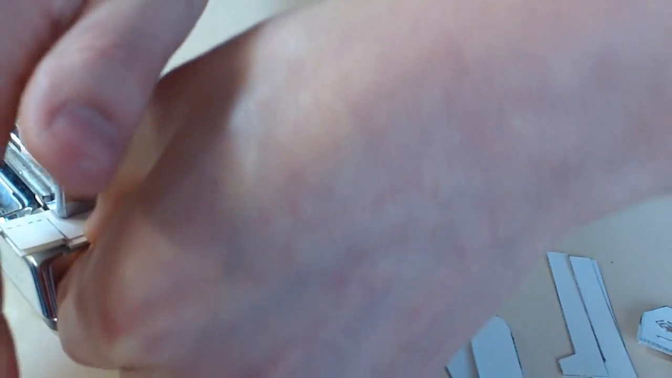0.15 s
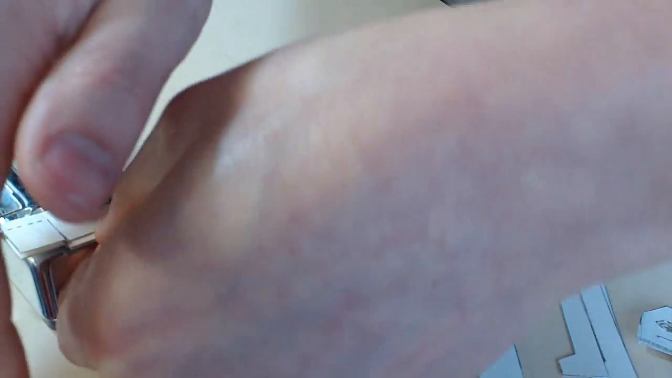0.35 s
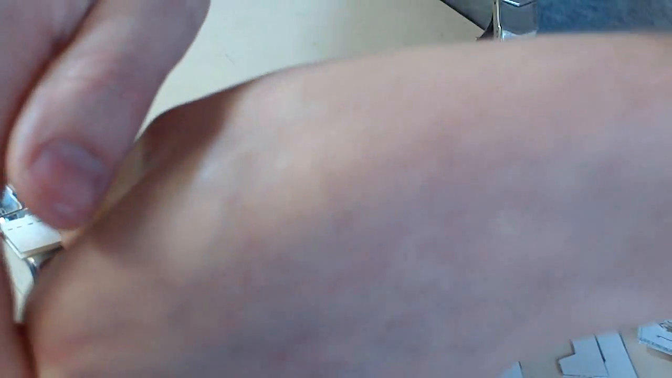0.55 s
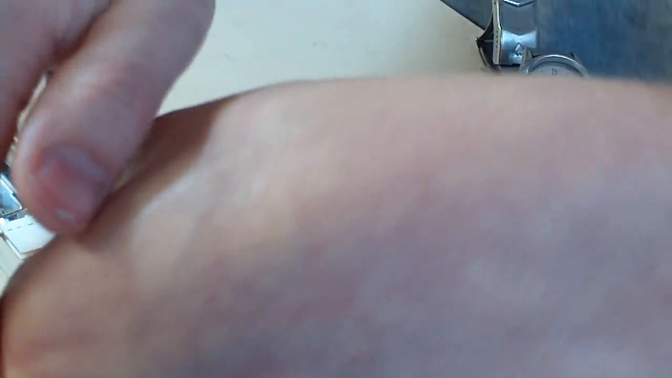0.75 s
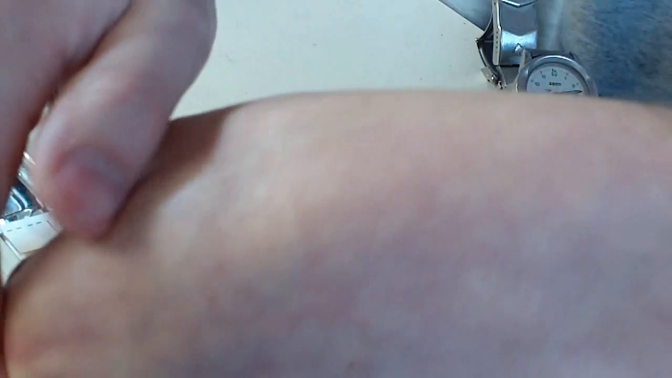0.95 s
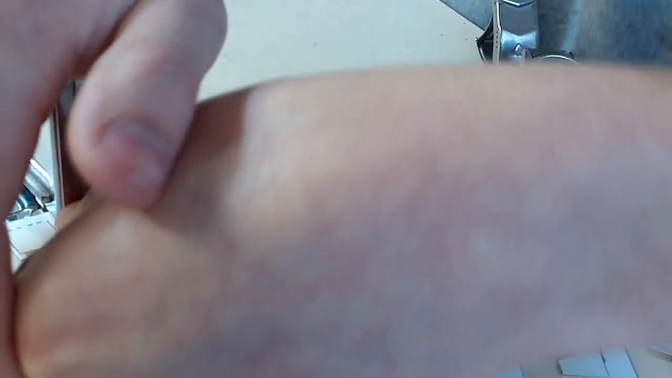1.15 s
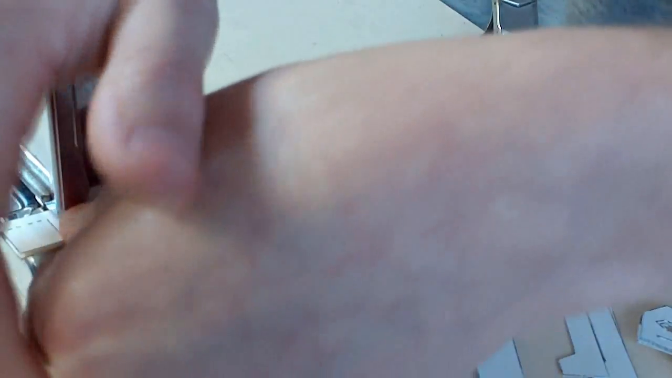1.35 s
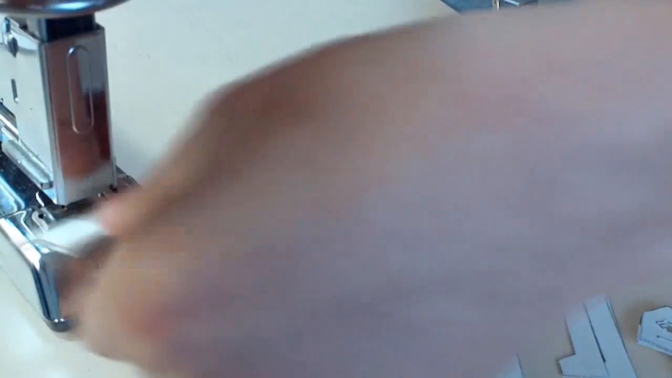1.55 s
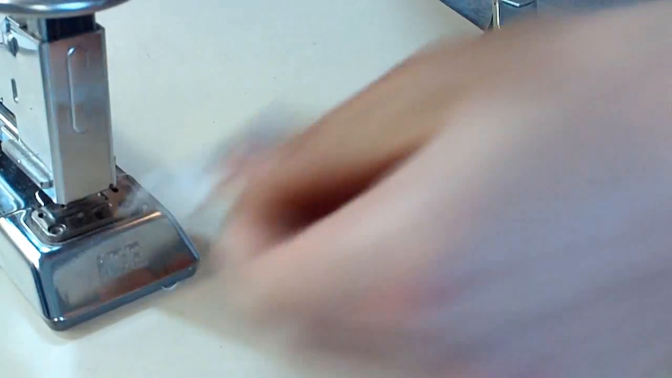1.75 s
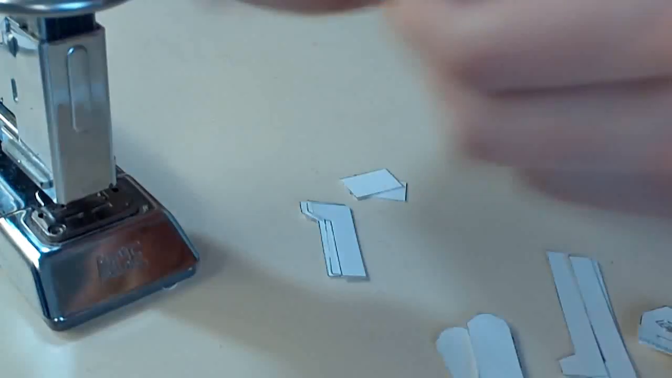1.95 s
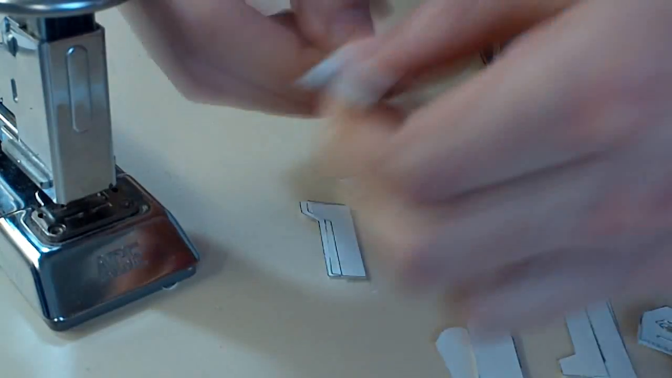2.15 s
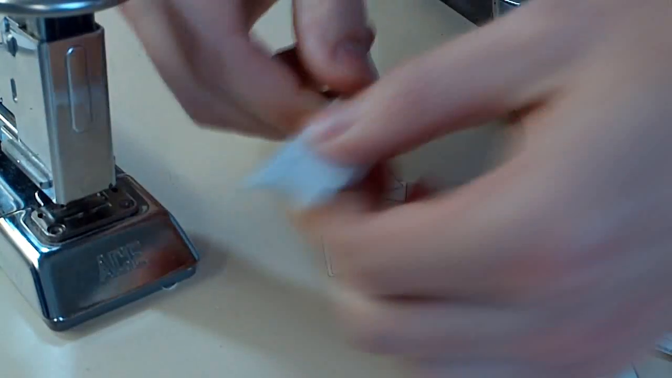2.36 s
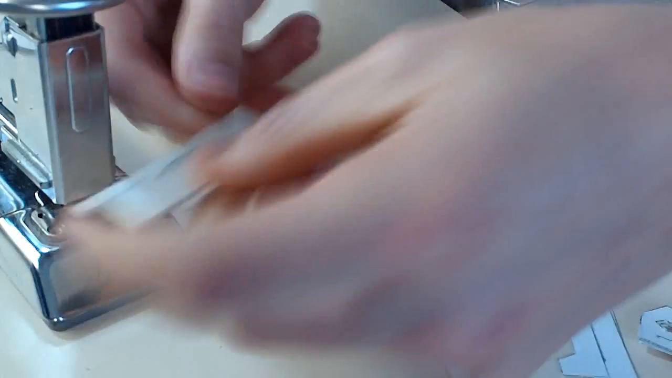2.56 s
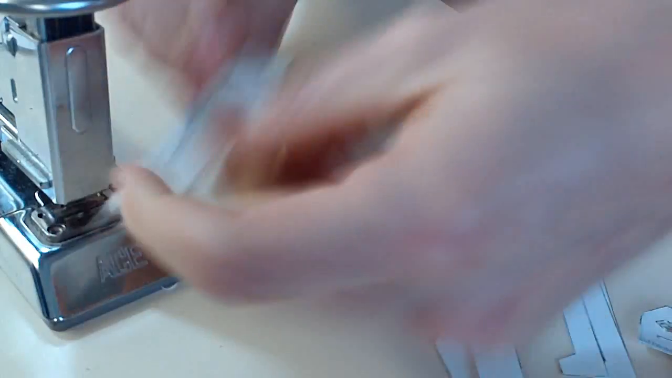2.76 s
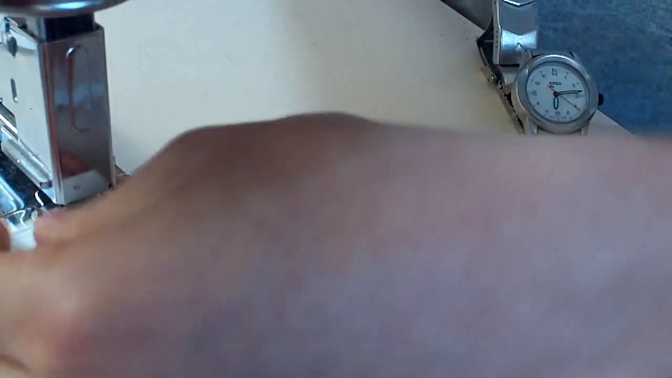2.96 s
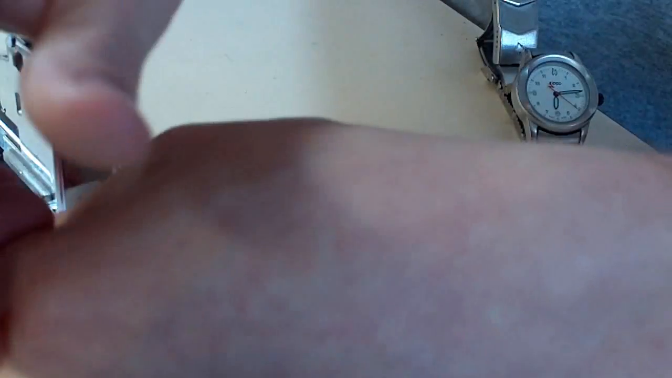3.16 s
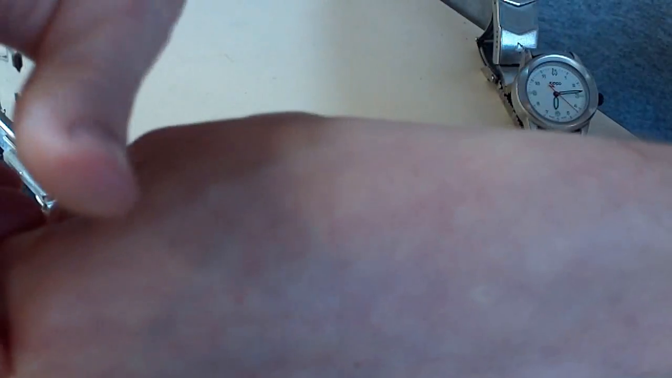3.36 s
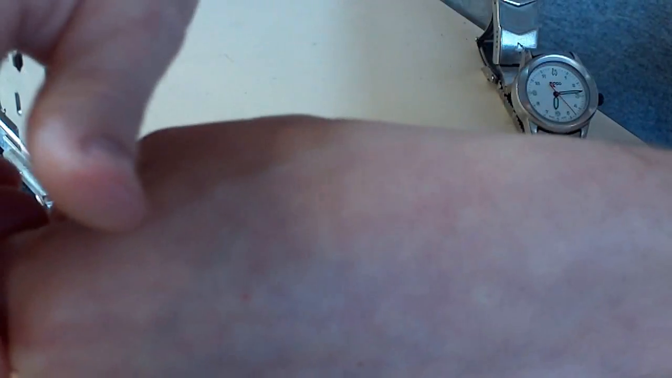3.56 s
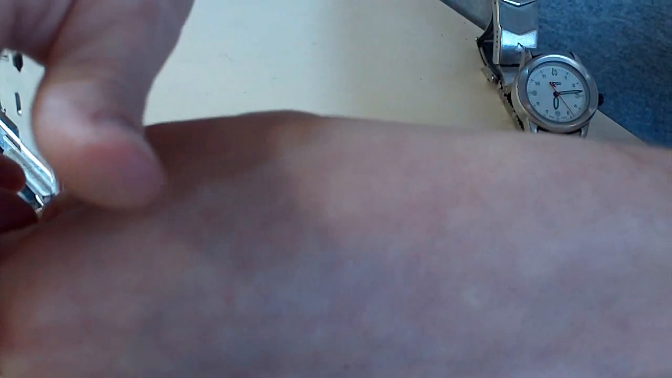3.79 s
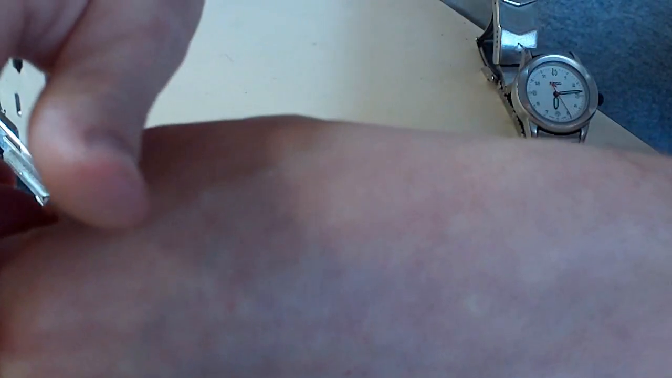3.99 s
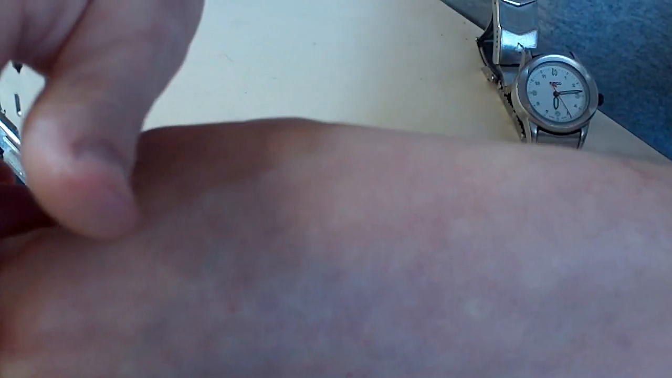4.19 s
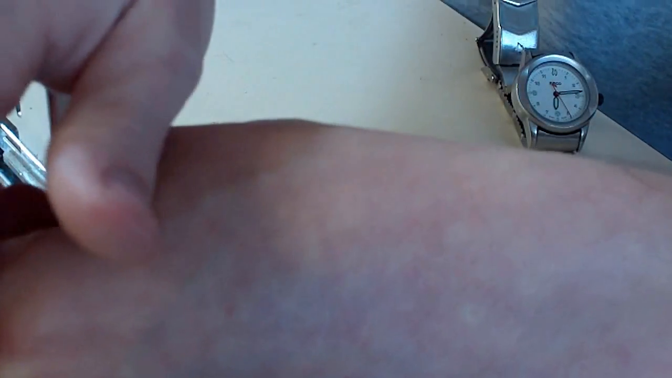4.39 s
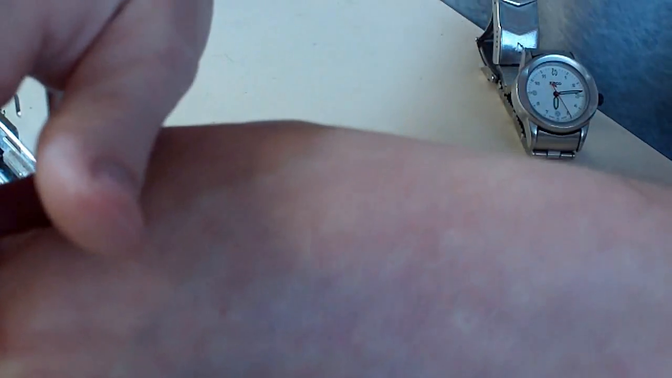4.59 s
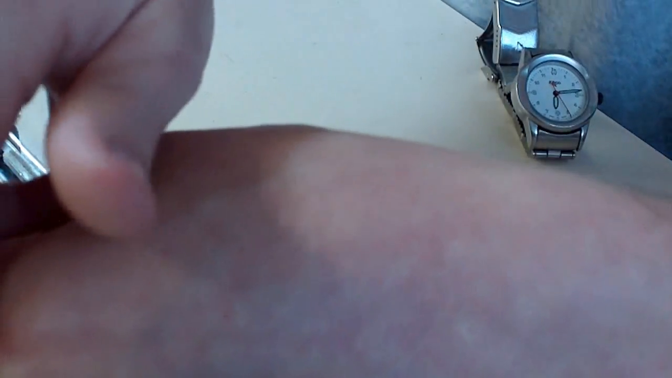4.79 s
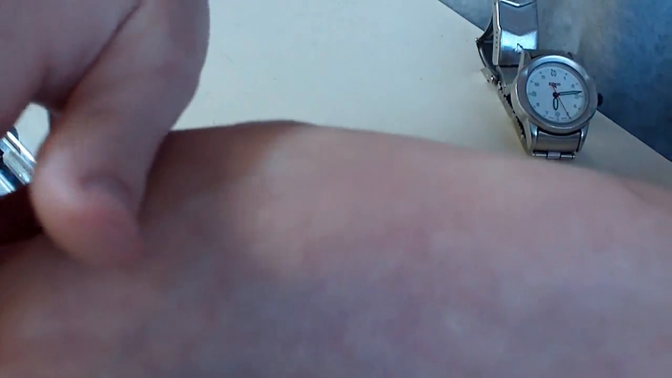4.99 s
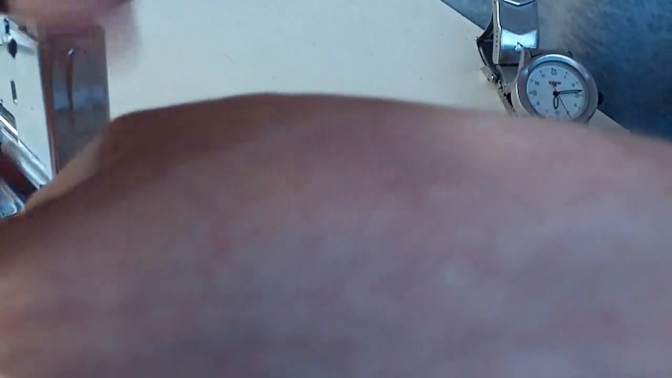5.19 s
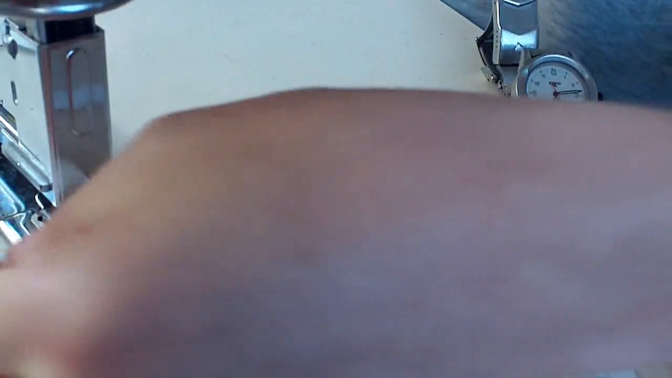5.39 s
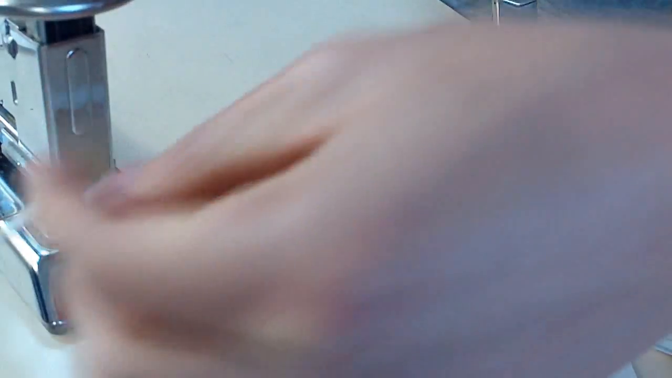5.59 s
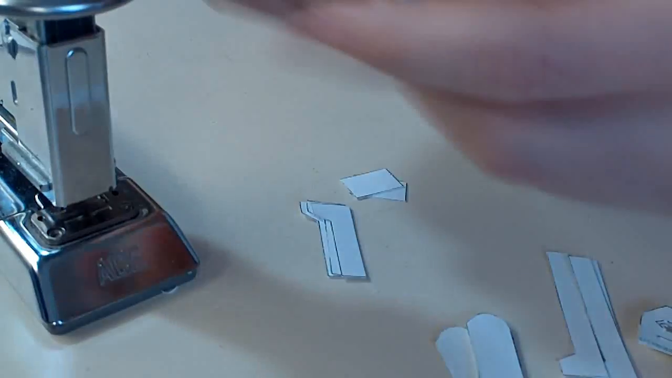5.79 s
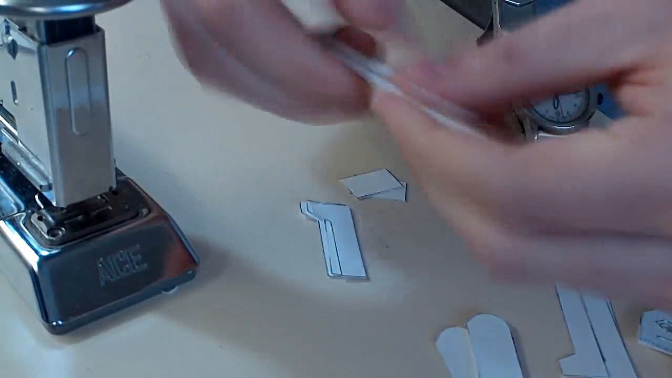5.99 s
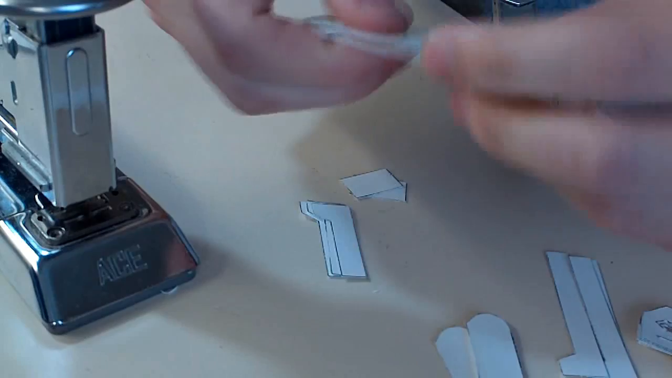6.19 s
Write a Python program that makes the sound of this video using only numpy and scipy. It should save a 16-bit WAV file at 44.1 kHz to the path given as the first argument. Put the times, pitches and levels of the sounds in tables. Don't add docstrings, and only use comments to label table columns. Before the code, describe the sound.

Steady hiss and low rumble of a small quiet room, with faint fingers rustling on card. At 0.2 s a stapler blade snaps through with a sharp steel click and a short crunch, stirring the desk. At 0.8 s the head bottoms out: a very loud, flattened thud with low wooden boom, crushed card and quick bounces. Around 1.3 to 1.5 s the spring slides and the arm clacks back with small ticks. Soft rubbing and card rustle continue from 1.6 s, fading to near-quiet hiss by 3 s. A brief rustle at 4.15 s leads to the second snap at 4.27 s, a second heavy thud at 4.7 s, and a clack at 5.07 s with a longer loose metal rattle to 5.2 s. Light card handling and tiny ticks, strongest near 5.9 s, end it. Close, noisy, dull-topped microphone, slightly louder right, overloading on blows, with tiny dropouts.

```python
import sys
import numpy as np
from scipy import signal
from scipy.io import wavfile
from scipy.ndimage import uniform_filter1d

SR = 44100
rng = np.random.default_rng(int(sys.argv[2]) if len(sys.argv) > 2 else 0)


def attenuation_scalar(level_db):
    decades = np.asarray(level_db, float) / 20
    return 10 ** decades


def digitize_waveform(pressure):
    field = np.atleast_2d(pressure).T
    bounded = np.clip(field, -1, 1)
    quanta = np.round(bounded * 32767).astype(np.int16)
    wavfile.write(sys.argv[1], SR, quanta)


N = 275149

# start_s, steel_db, desk_db, pace (1 = usual spacing of contacts)
SLAMS = [
    (0.8248, 2.5, -1.5, .8),
    (4.699, -1.2, 0.6, 1.05),
]
# start_s, steel_db, desk_db, pace (1 = usual spacing of contacts)
RETURNS = [
    (1.3975, -2.2, 5.5, .9),
    (5.0717, -.8, -3, 1.05),
]


def rms_one(x):
    return x / np.sqrt(np.mean(x ** 2) + 1e-20)


def at_hz(points, hz, column=1):
    points = np.array(points)
    return np.interp(np.log(hz), np.log(points[:, 0]), points[:, column])


def bank(white, low_hz, count, size=2):
    edges = low_hz * 2 ** (np.arange(count + 1) / size)
    bands = []
    for k, (low, high) in enumerate(zip(edges, edges[1:])):
        band_pass = signal.butter(2, [low, high], "band", fs=SR, output="sos")
        bands.append((np.sqrt(low * high), signal.sosfilt(band_pass, white[k % 2])))
    return bands


def drift(rate_hz):
    r = np.exp(-80 * np.pi * rate_hz / SR)
    slow = signal.lfilter([1], [1, -2 * r, r * r], rng.standard_normal(N // 40 + 2002))
    slow = slow[2000:]
    return np.interp(np.arange(N) / 40, np.arange(len(slow)), rms_one(slow))


def ring(force, hz, t60):
    r = attenuation_scalar(-60 / (t60 * SR))
    w = 2 * np.pi * hz / SR
    return signal.lfilter([0, np.sin(w)], [1, -2 * r * np.cos(w), r * r], force + 1e-18)


def hiss():
    # pitch_hz, level_db (per Hz)
    hiss_colour = [(13, -33), (22, -6), (48, 0.5), (90, -14.5), (115, 0.5), (150, -5.5), (211, -7),
                   (318, -11.5), (351, -13), (543, -6), (692, -11), (1370, -11), (1920, -16.5),
                   (5450, -16.5), (7300, -19.5), (9490, -56.5), (16100, -120)]
    level_db = -38
    together = drift(3)
    white = rng.standard_normal((2, N + SR // 2))
    noise = np.zeros(N)
    for hz, band in bank(white, 22.18, count=26, size=3):
        band_db = at_hz(hiss_colour, hz) + .4 * together + .6 * drift(8)
        noise += attenuation_scalar(band_db) * band[SR // 2:]
    return attenuation_scalar(level_db) * rms_one(noise)


def swells(rows, t):
    return sum(attenuation_scalar(db - 10 * np.maximum((s - t) / rise, (t - s) / fall)) ** 2 for s, db, rise, fall in rows)


def rubbing():
    # peak_s, level_db, rise_s and fall_s (each per 10 dB)
    rustle_moves = [(0.072, -41, .1, .1), (0.35, -33, .09, .07), (0.624, -40, .03, .1),
                    (1.623, -37, .035, .12), (1.749, -40, .03, .07), (2.01, -36, .3, .2),
                    (4.168, -35, .035, .065), (4.568, -38, .14, .08), (4.66, -33, .08, .16),
                    (5.3, -41, .2, .4), (5.882, -36, .5, .1), (6.0, -37, .04, 1.5)]
    # peak_s, level_db, rise_s and fall_s (each per 10 dB)
    slide_moves = [(0.81, -41, .2, .12), (1.336, -35.5, .045, .07), (1.395, -36, .06, .1),
                   (1.449, -25.5, .035, .035), (1.48, -35, .03, .12), (5.065, -34, .025, .05),
                   (5.1, -27, .015, .07), (5.148, -29, .012, .04), (5.18, -35, .03, .1)]
    # pitch_hz, level_db (per Hz)
    skin_colour = [(710, -33), (1200, -3), (1300, -4.5), (2520, -2), (3750, -9), (5400, -6.5), (6720, -9),
                   (7300, -19.5), (9490, -52), (16100, -120)]
    # pitch_hz, level_db, t60_s
    card_modes = [(1400, -23.5, 0.011), (2200, -24, 0.007), (2550, -20, 0.009), (3150, -36, 0.0024)]
    # pitch_hz, level_db, t60_s
    base_modes = [(283.3, 2, 0.038), (370, -0.5, 0.034), (870, 5, 0.0091)]

    t = np.arange(0, N + 40, 40) / SR
    settle_s, let_go_s = .25, .1
    held = np.zeros(len(t))
    for down, up in zip(SLAMS, RETURNS):
        settling = (t - down[0]) / settle_s
        letting_go = 30 * (up[0] - let_go_s - t)
        held += np.clip(np.minimum(settling, letting_go), 0, 3)
    hands = attenuation_scalar(-47.5 - 10 * held) ** 2
    rustle, slide = swells(rustle_moves, t), swells(slide_moves, t)

    def gain(hands_db, rustle_db, slide_db):
        power = hands * attenuation_scalar(hands_db) ** 2 + rustle * attenuation_scalar(rustle_db) ** 2 + slide * attenuation_scalar(slide_db) ** 2
        return np.interp(np.arange(N) / SR, t, np.sqrt(power))

    happens = rng.random((2, N)) < 6000 / SR
    size = attenuation_scalar(2.24 * np.minimum(rng.exponential(1, (2, N)), 6.5))
    grains = happens * size * rng.choice([-1, 1], (2, N))
    together = drift(25)
    bright = np.zeros(N)
    for hz, band in bank(grains, 1195, count=8, size=3):
        bright += attenuation_scalar(at_hz(skin_colour, hz) + 1.5 * together + 1.2 * drift(18)) * band
    hollow = np.zeros(N)
    for hz, level_db, t60 in card_modes:
        hollow += attenuation_scalar(level_db + 2.0 * drift(9.5)) * ring(rms_one(grains[1]), hz, t60)
    dull = sum(attenuation_scalar(level_db) * rms_one(ring(grains[0], hz, t60)) for hz, level_db, t60 in base_modes)
    dull = attenuation_scalar(1.5 * together) * rms_one(dull)
    return gain(0, 0, 0) * rms_one(bright) + gain(0, 3, 1.5) * hollow + gain(.6, -8.5, -1.5) * dull


def staged(snap, slam, back):
    # start_s, steel_db, desk_db, pace (1 = usual spacing of contacts)
    snap_starts = [
        (0.2136, -.6, -.3, 1.05),
        (4.2706, 1.2, .7, .97),
    ]
    rows = []
    for strokes, template in ((snap_starts, snap), (SLAMS, slam), (RETURNS, back)):
        for s, steel_db, desk_db, pace in strokes:
            for ms, *columns in template:
                rows.append((s + pace * ms / 1000, steel_db, desk_db, *columns))
    return np.array(rows)


def crunch():
    # start_s, level_db (at 500 Hz), slope_db (per octave), t60_s (at 500 Hz)
    crushes = [
        (0.2132, -24.5, 1.2, 0.3),
        (0.8249, -1.5, -3.5, 0.11),
        (0.8385, -16, -3, .28),
        (1.3978, -24.5, 2.5, .08),
        (4.2706, -21, -.7, 0.27),
        (4.6996, -.7, -5, 0.12),
        (4.7170, -12, -3.5, 0.28),
        (5.0726, -34, 2, 0.088),
    ]
    out = np.zeros(N)
    t = np.arange(int(.35 * SR)) / SR
    for s, level_db, slope_db, t60 in crushes:
        burst = np.zeros(len(t))
        for hz, band in bank(rng.standard_normal((2, len(t))), 298.6, count=9):
            fall_db = 60 * t / (t60 * (500 / hz) ** 0.4)
            burst += attenuation_scalar(level_db + slope_db * np.log2(hz / 500) - fall_db) * rms_one(band)
        at = round(s * SR)
        out[at:at + len(t)] += burst * np.clip(t / 0.0016, 0, 1)
    return out


def struck(modes, s, level_db, tilt_db, pivot_hz, contact_ms, scatter_db, spread_ms):
    luck = rng.standard_normal((len(s), 2 * len(modes)))
    late = rng.random((len(s), len(modes)))
    out = np.zeros(N)
    for k, (hz, mode_db, t60) in enumerate(modes):
        softness = 1 / (1 + (hz * contact_ms / 1000) ** 4)
        tilt = tilt_db * np.log2(hz / pivot_hz)
        strength = attenuation_scalar(level_db + mode_db + tilt + scatter_db * luck[:, 2 * k])
        at = np.round((s + late[:, k] * spread_ms / 1000) * SR).astype(int)
        force = np.zeros(N)
        force[at] = strength * softness * np.sign(luck[:, 2 * k + 1])
        out += ring(force, hz, t60)
    return out


def stapler():
    # pitch_hz, level_db, t60_s
    steel_modes = [(972, -7.5, 0.013), (1360, -5, 0.039), (1630, -4, .012), (1760, 2.5, 0.017),
                   (1844, 3.5, 0.021), (2160, -2.5, 0.018), (2570, -19, .014), (3190, -18.5, 0.015),
                   (3670, -11, 0.0084), (4020, -10, 0.009), (4330, -9, 0.013), (4675, -6.5, 0.01),
                   (4890, -4.5, 0.0087), (5530, -6.5, 0.01), (5660, -6.5, 0.0099), (6050, -9, 0.0099),
                   (6830, -11, 0.0096), (7360, -11, 0.011)]
    # pitch_hz, level_db, t60_s
    desk_modes = [(214, -16, 0.16), (259, -12.5, .14), (301.6, -12, 0.092), (334.6, -17.5, 0.11),
                  (399, -8.5, 0.091), (464.4, -18.5, 0.041), (488, -13.5, .09), (537, -15, 0.055),
                  (604, -18.5, 0.036), (681.4, -12, 0.031), (785, -12, 0.07), (874, -10.5, 0.055),
                  (979, -19, .05), (1093, -9, 0.028), (1400, -8, 0.035), (1650, -16, 0.033),
                  (2010, -7, .025), (2330, -19.5, .02)]
    # after_ms, steel_db, bright_db (steel, per octave), desk_db, contact_ms
    snap_hits = [
        (-2.6, -31, 3, -30, 1.2),
        (0, -10, 4.5, -7, 1.5),
        (3.8, -9.5, -2.5, -19, 1.2),
        (10, -22, 4, -10, 2.2),
        (26, -44, 1.5, -13, 2.1),
        (39, -45, 8, -24, 2.6),
    ]
    slam_hits = [
        (-2.5, -26, 2.1, -18, 1.2),
        (0, -17, 1.5, 7, .75),
        (8, -27, .6, -3, .9),
        (17.5, -22, 2.1, -5, 1.0),
        (27, -30, -9, -8, 1.4),
        (43, -35, -1.5, -11, 1.5),
    ]
    return_hits = [
        (-2.8, -25, 5, -31, .9),
        (0, -7, .4, -26, .7),
        (13.5, -29, 6, -34, .9),
    ]
    # start_s, steel_db, bright_db (per octave), desk_db
    loose_ticks = [(0.3412, -38, 1.5, -36), (1.3325, -33, -5, -42), (1.348, -30, -3, -26),
                   (1.4324, -31, -8, -20), (1.441, -25, 3, -24), (1.454, -29, -8, -19),
                   (1.462, -31, -3, -28), (1.75, -43, 1.5, -46), (4.15, -40, -6, -34),
                   (5.0035, -31, 1.5, -30), (5.02, -32, .5, -36), (5.0306, -34, -3, -24),
                   (5.046, -35, -6, -36), (5.054, -30, -1.5, -30), (5.0995, -25, -10, -27),
                   (5.104, -25, -8, -29), (5.112, -28, .5, -24), (5.1395, -22, -7, -30),
                   (5.1422, -16.5, -5, -27), (5.15, -28, -3, -25), (5.161, -40, 6, -22),
                   (5.1724, -23, -6, -36), (5.189, -33, -4, -29), (5.201, -32, -3, -28),
                   (5.838, -33, 1.5, -45), (5.996, -38, -11, -35)]
    tick_contact_ms = 1.2

    ticks = [(s, 0, 0, *columns, tick_contact_ms) for s, *columns in loose_ticks]
    contacts = np.vstack([staged(snap_hits, slam_hits, return_hits), ticks])
    s, arm_db, push_db, steel_db, bright_db, desk_db, contact_ms = contacts.T
    steel = struck(steel_modes, s, arm_db + steel_db, bright_db - .8, 2280, 0, scatter_db=1.8, spread_ms=1.6)
    hardness_db = 5.8 * (1.8 - contact_ms)
    knock = struck(desk_modes, s, push_db + desk_db, hardness_db, 500, contact_ms, scatter_db=3.0, spread_ms=1.4)
    return knock + steel


def desk_body():
    # pitch_hz, t60_s
    body_modes = [(88, 0.44), (124, 0.22), (160, 0.2), (262, 0.21), (380, 0.14)]
    # after_ms, then level_db of each slow mode
    snap_pushes = [
        (.7, -16, -13, -17, -12, -12),
        (23.5, -38, -36, -32, -7.5, -6.5),
    ]
    slam_pushes = [
        (1.7, -7.5, -3, -1.5, -13, -13),
        (20.5, -19, -12, -13, -15, -18),
    ]
    return_pushes = [
        (-46, -40, -40, -34, -27, -27),
        (6, -36, -33, -28, -28, -30),
        (62, -42, -38, -28, -21, -26),
    ]
    s, _, desk_db, *levels = staged(snap_pushes, slam_pushes, return_pushes).T
    out = np.zeros(N)
    for (hz, t60), level_db in zip(body_modes, levels):
        force = np.zeros(N)
        force[np.round(s * SR).astype(int)] = -attenuation_scalar(desk_db + level_db)
        out += ring(force, hz, t60)
    return signal.lfilter([.04], [1, -.96], out)


def room(x):
    # pitch_hz, t60_s, level_db
    tail_bands = [(90, 0.35, -18), (250, .3, -15.5), (700, .28, -19), (1300, 0.28, -19),
                  (1930, 0.17, -28.5), (3000, 0.41, -15), (5500, 0.32, -16), (7500, 0.1, -17.5)]
    t = np.arange(int(.6 * SR)) / SR
    tail = np.zeros(len(t))
    for hz, band in bank(rng.standard_normal((2, len(t))), 56.9, count=14):
        tail += attenuation_scalar(at_hz(tail_bands, hz, column=2) - 60 * t / at_hz(tail_bands, hz)) * band
    build = np.clip(t / 0.013, 0, 1)
    return signal.fftconvolve(x, tail * build * attenuation_scalar(-16.5))[:N]


def scene():
    blows = stapler()
    struck_sounds = blows + room(blows) + desk_body() + crunch()
    low_cut = signal.butter(2, 62, "high", fs=SR, output="sos")
    heard = signal.sosfilt(low_cut, struck_sounds)
    return np.tile(heard + rubbing() + hiss(), (2, 1))


def input_stage(x):
    top = 1.5
    return top * np.tanh((x / top) ** 3 / 3 + x / top)


def brief_dips(x):
    dip_times = [1.9165, 3.951, 5.6192]
    fade_ms = 4.6
    apart_s = np.abs(np.arange(N) / SR - np.array(dip_times)[:, None]).min(axis=0)
    return x * np.clip(apart_s * 1000 / fade_ms, .06, 1)


def ragged_top(x):
    # from_hz, keep_db (silent below it)
    gates = [(7050, -86), (7230, -75), (7420, -73.5), (7650, -70), (7900, -60)]
    hz, _, frames = signal.stft(x, SR, nperseg=1024)
    for (low_hz, keep_db), (high_hz, _) in zip(gates, gates[1:] + [(SR, 0)]):
        band = (hz >= low_hz) & (hz < high_hz)
        level = uniform_filter1d(np.abs(frames[band][:5]).mean(axis=0), size=2)
        frames[band] *= level > attenuation_scalar(keep_db)
    return signal.istft(frames, SR, nperseg=1024)[1][:N]


def top_cut(x):
    return signal.sosfilt(signal.butter(12, 8150, fs=SR, output="sos"), x)


def record(dry):
    dipped = brief_dips(input_stage(dry[0]))
    cutoff_hz = 7366
    low_pass = signal.cheby2(10, 60, cutoff_hz * 1.147, fs=SR, output="sos")
    dull = signal.sosfilt(low_pass, dipped)
    pan_db = np.array([[-3.01], [0]])
    panned = np.clip(ragged_top(dull) * attenuation_scalar(pan_db + 1.24), -1, 1)
    return top_cut(panned)


dry = scene()
out = record(dry)
digitize_waveform(out)
```